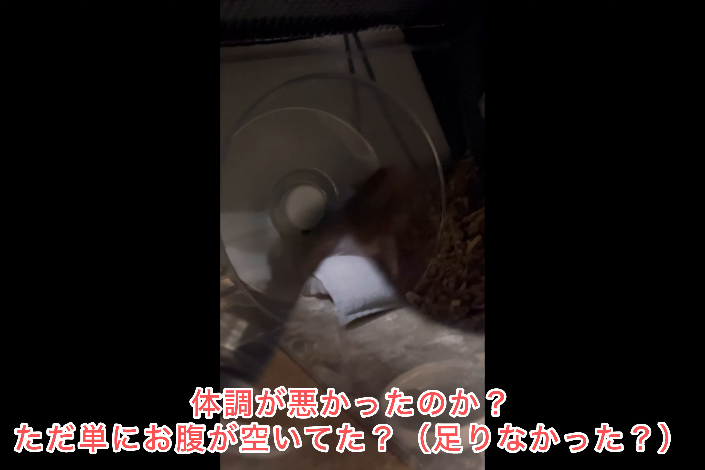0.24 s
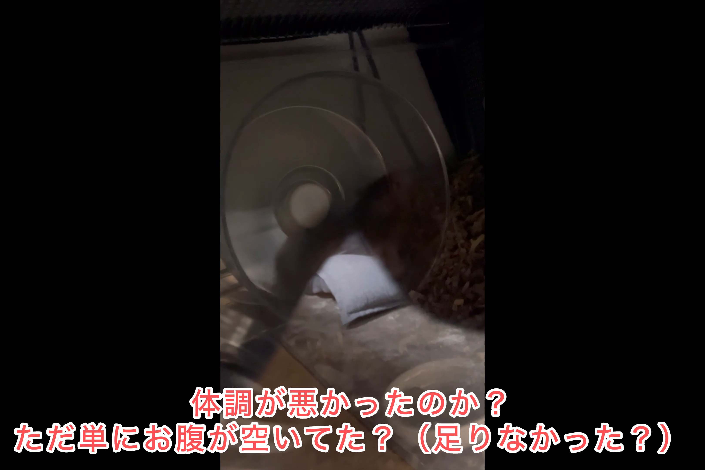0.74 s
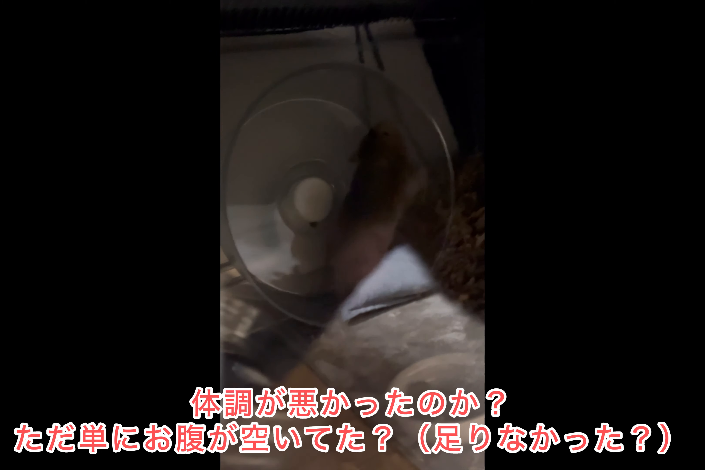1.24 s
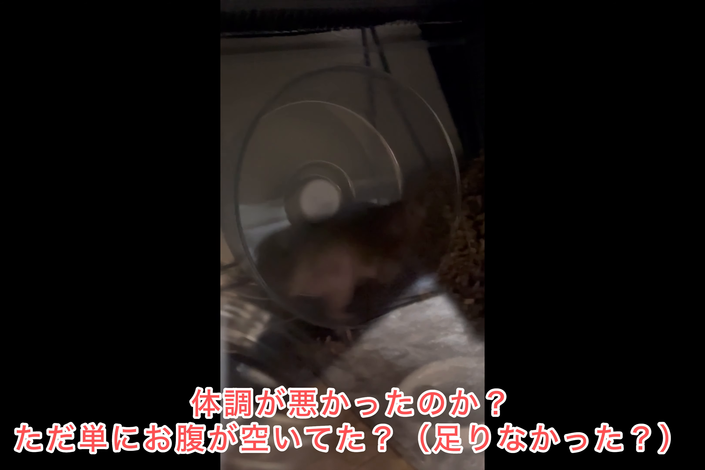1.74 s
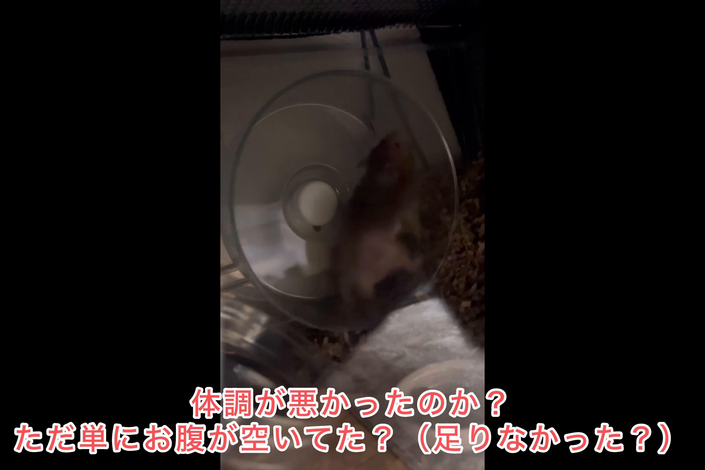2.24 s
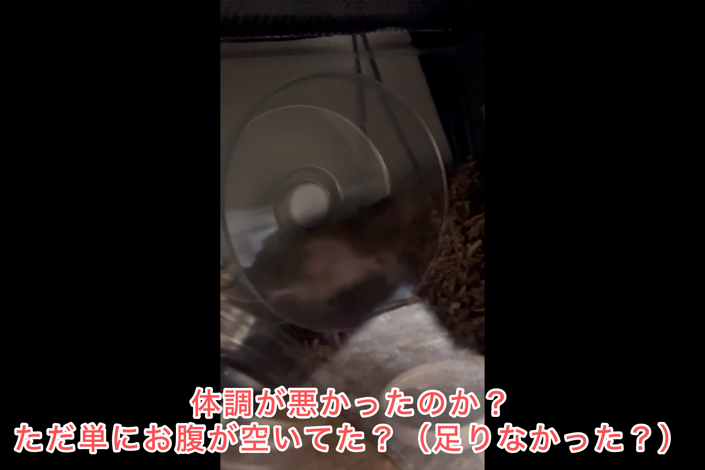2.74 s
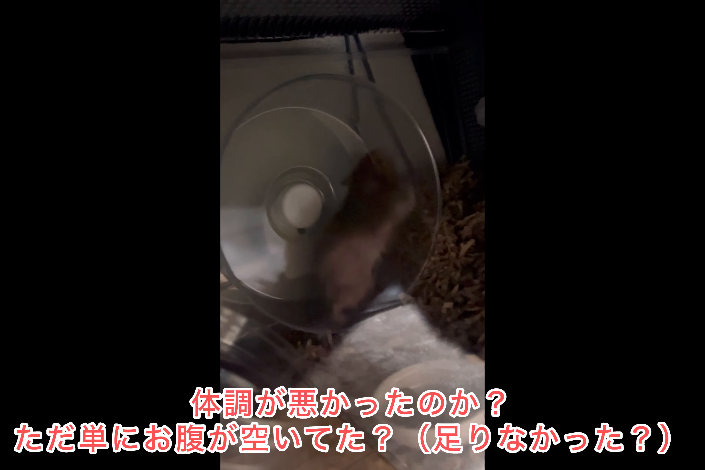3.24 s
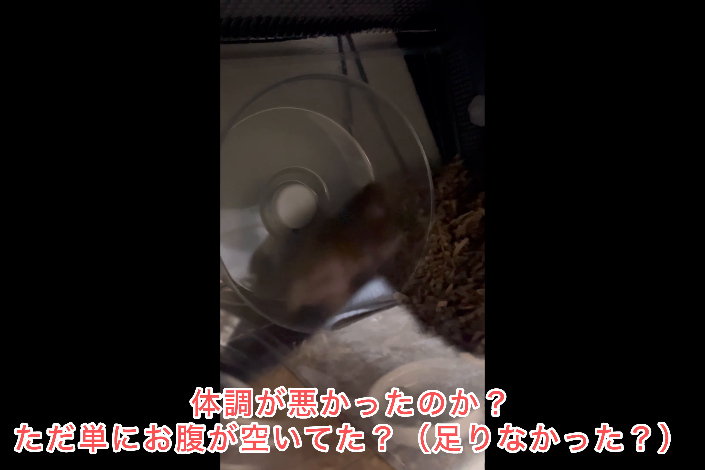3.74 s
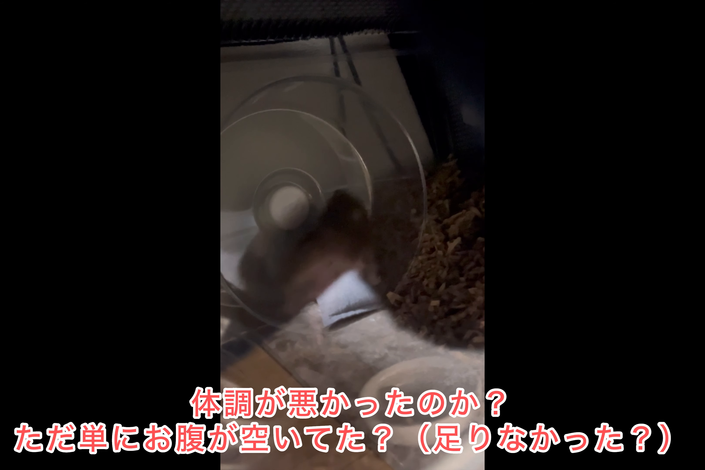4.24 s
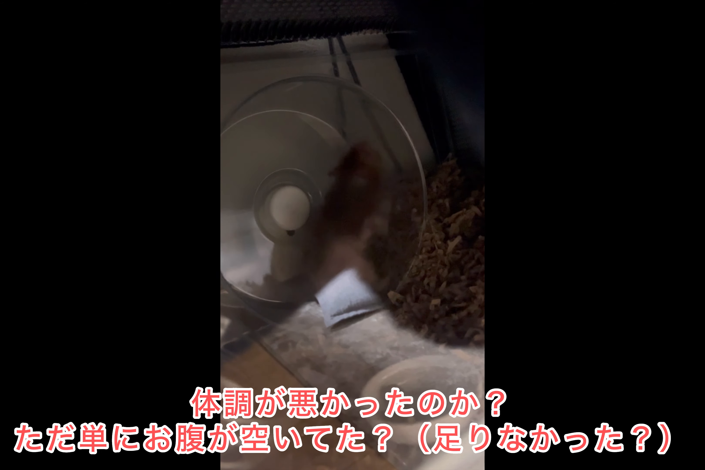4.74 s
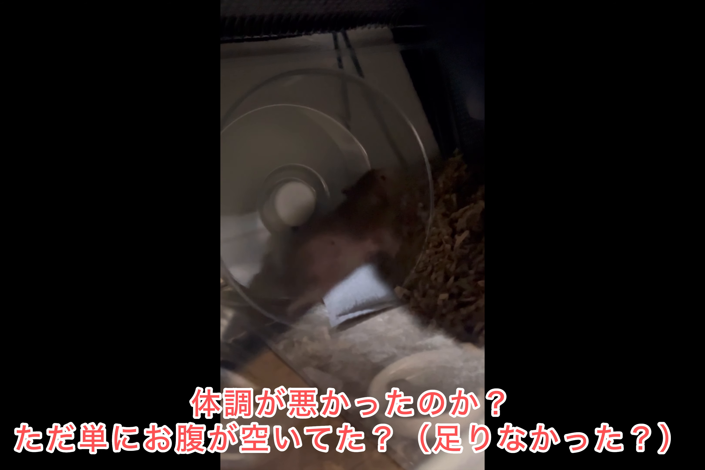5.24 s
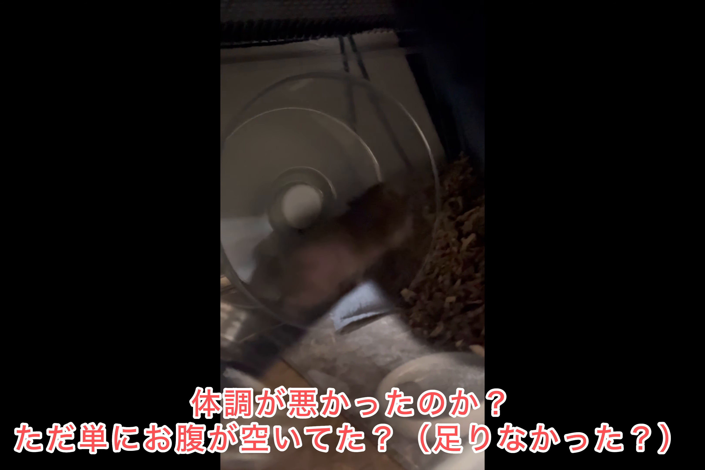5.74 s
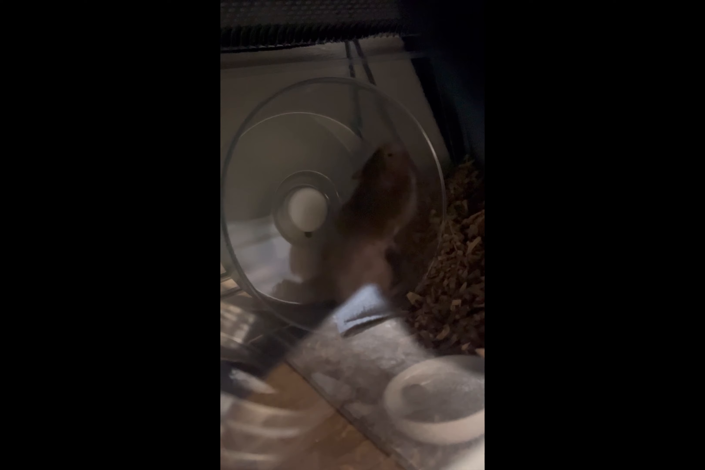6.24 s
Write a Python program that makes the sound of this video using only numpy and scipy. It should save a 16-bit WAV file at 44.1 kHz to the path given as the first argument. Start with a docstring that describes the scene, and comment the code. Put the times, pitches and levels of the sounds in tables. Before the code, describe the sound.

Indoors, close to a hand-held phone, a hamster runs in a plastic exercise wheel. From 0 s, quick scraping swishes come about seven per second, each with airy high hiss, rubbing plastic and a faint hollow ring, dipping briefly between strides. Light knocks and tiny claw-like ticks dot the first second; the hiss softens near 0.9 s and returns. Around 1.8 s a low stand rumble rises, and at 1.9 s comes the strongest dull plastic knock. Running continues steadily. At 3.3 s another thump lands, followed by close muffled rustling and soft low bumps until about 4 s. The whirr then nearly dies away at 4.2 s, leaving rumble and faint rustle, and rebuilds from 4.5 s. Strong regular strides continue to 6.5 s, with small knocks and ticks near 5.6, 5.9 and 6.4 s. Room air is faint, with short, dry reflections.

```python
"""In a quiet room, close to a hand-held phone, a hamster runs in a plastic exercise wheel standing to the left.
Each stride drives the wheel round its hub: noise filtered by resonances gives bearing hiss and a ringing drum.
A low noise rumble is the stand; the whirr nearly dies away just after four seconds, then picks up again.
Soft rustling is shaped noise; dull knocks are damped modes, and small ticks are clicks with short scratches."""
import sys
import numpy as np
from scipy import signal
from scipy.fft import rfft, irfft, next_fast_len
from scipy.io import wavfile
from scipy.ndimage import uniform_filter1d, map_coordinates

SR = 44100
rng = np.random.default_rng(int(sys.argv[2]) if len(sys.argv) > 2 else 0)


def pcm_store(signal):
    """Save signal as 16-bit PCM."""
    levels = np.round(np.clip(np.atleast_2d(signal), -1, 1) * 32767)
    wavfile.write(sys.argv[1], SR, levels.astype(np.int16).T)


N = 285750

# Spectrum columns give relative level; levels over time are set before the trims in the functions.
# rustling close to the phone, steady part: [t/s, level/dB]
RUSTLE_LEVEL = [(0, -66), (.65, -68), (1.1, -64), (1.9, -65), (2.3, -69.5), (3.1, -63), (3.25, -53),
                (3.95, -52.5), (4.1, -61.5), (4.5, -63.5), (5.2, -67.5), (5.5, -59.5), (6.1, -73),
                (6.48, -64.5)]
# single brushes over it: [middle t/s, length/s, dull level/dB, bright level/dB]
BRUSH_STROKES = [(0.122, 0.026, -66, -61), (0.279, 0.024, -58.5, -54), (0.43, 0.056, -61.5, -77),
                 (0.876, 0.55, -65.5, -64.5), (1.012, 0.093, -61.5, -55), (3.29, 0.11, -55.5, -60),
                 (3.444, 0.043, -50, -64), (3.534, 0.05, -51, -62), (3.642, 0.034, -47.5, -67),
                 (3.737, 0.13, -56, -61), (3.95, 0.15, -61, -58.5), (4.01, 0.056, -52.5, -59.5),
                 (4.193, 0.029, -50.5, -77), (4.885, 0.34, -60, -70.5), (4.96, 0.07, -71, -59),
                 (5.357, 0.3, -58.5, -59), (5.562, 0.18, -65, -57), (5.836, 0.42, -64.5, -64),
                 (6.455, 0.046, -54.5, -68)]
# spectrum of its dull part: [f/Hz, level/dB]
CLOTH_SPECTRUM = [(40, -17), (110, 4), (200, 2.5), (350, 2), (600, -3), (1000, -10.5), (2000, -27),
                  (3000, -38), (7000, -52), (15000, -60)]
# spectrum of its grainy part: [f/Hz, level/dB]
GRIT_SPECTRUM = [(100, -27), (350, 5.5), (900, 9), (1800, 0.5), (4000, 1.5), (6500, -18), (15000, -70)]
# likeness of the rustling at the left and right ports: [f/Hz, likeness/1]
RUSTLE_LIKENESS = [(60, 0.52), (130, 0.66), (290, 0.67), (640, 0.15), (1400, 0.82), (3100, 0.74),
                   (15000, 0.39)]
# rumble of the stand: [t/s, level/dB]
STAND_LEVEL = [(0, -57), (1.2, -55.5), (1.45, -60), (1.68, -60.5), (1.78, -44.5), (1.9, -51), (2.2, -45),
               (2.65, -48.5), (3.2, -44.5), (3.45, -44.5), (3.65, -39), (3.98, -45.5), (4.1, -38),
               (4.3, -47.5), (4.62, -48.5), (5.15, -57.5), (6.2, -53), (6.48, -42)]
# spectrum of that rumble: [f/Hz, level/dB]
RUMBLE_SPECTRUM = [(20, -56), (35, -47), (48, 0.5), (58, 5.5), (66, 0.5), (82, -7.5), (105, -8.5),
                   (140, -12.5), (200, -34), (400, -100)]
# dull knocks: [t/s, thump level/dB, ring level/dB, puff level/dB]
KNOCK_HITS = [(0.106, -60, -48, -62), (0.268, -59, -49, -54), (.435, -47, -44, -70), (0.868, -55, -47, -62),
              (1.276, -43.5, -67, -58), (1.538, -42.5, -48, -54), (1.937, -27, -26, -44),
              (3.275, -31.5, -45, -59), (3.69, -37, -45, -57), (4.01, -43, -49, -74),
              (4.179, -58, -44, -55), (5.608, -58, -42, -51), (6.128, -61, -46, -56.5),
              (6.426, -47, -39, -48)]
# modes of the knocked stand: [f/Hz, level/dB, t60/s]
STAND_MODES = [(75.6, 4, 0.088), (88, -4, 0.056)]
# modes of the knocked plastic: [f/Hz, level/dB, t60/s]
PLASTIC_MODES = [(368, -10, 0.14), (441, -21, 0.2), (535, -16, 0.24), (560, 0, 0.065), (640, -15, 0.03),
                 (862, -12, 0.03), (1077, -19, 0.04), (1740, -14, 0.035), (2080, -21, 0.03)]
# soft bumps, single low pushes: [t/s, level/dB, f/Hz]
BUMP_PUSHES = [(0.271, -40.5, 280), (0.297, -44, 230), (1.033, -42, 130), (3.396, -38, 85),
               (3.571, -33, 115), (3.593, -31, 85), (3.6436, -26, 172), (3.738, -37, 130),
               (3.768, -36, 110)]
# tiny dry ticks, before their colouring: [t/s, level/dB]
TICK_HITS = [(0.148, -42), (0.2665, -36), (.279, -39), (0.2915, -32), (.928, -42), (1.539, -37),
             (4.179, -47), (4.195, -47), (5.607, -39), (5.855, -38), (5.877, -42), (5.885, -44),
             (5.8947, -32)]
# phase by which the left port leads for sound from the wheel: [f/Hz, lead/rad]
PORT_LEAD = [(20, 0), (690, -1.1), (1200, -.8), (1900, .2), (2400, 2.6), (2820, 1.85), (3300, 2.5),
             (3750, 1.2), (4300, 2), (4950, 1), (6000, np.pi), (7950, 2 * np.pi), (10150, 3 * np.pi),
             (12550, 4 * np.pi), (14850, 5 * np.pi), (16000, 17.3)]
# left minus right level for sound from the wheel: [f/Hz, level/dB]
PORT_TILT = [(130, -2), (500, -1), (1100, 1), (2000, -0.5), (4000, -2), (8000, 0.5)]
# strides: [start t/s, depth of the break at the start/dB (negative lifts), middle of the stroke t/s,
#           stroke length at half power/s, push level/dB, hollow ring level/dB]
STRIDE_STROKES = [(0.019, 18, 0.07, 0.065, -51.5, -54), (0.136, 10, 0.218, 0.064, -50, -52.5),
                  (0.287, 5.5, 0.335, 0.042, -51, -60), (0.409, 2, 0.485, 0.041, -47.5, -58.5),
                  (0.548, 6, 0.592, 0.045, -51, -56.5), (0.676, 22, 0.747, 0.055, -49, -57.5),
                  (0.814, 11, 0.879, 0.063, -63, -73), (0.95, -0.5, 1.054, 0.05, -53, -57.0),
                  (1.123, 3, 1.186, 0.073, -56.5, -58.0), (1.249, 17, 1.335, 0.067, -49.0, -54.5),
                  (1.41, 4.5, 1.47, 0.068, -50, -57), (1.537, 14, 1.613, 0.047, -50.5, -58.0),
                  (1.673, 5.5, 1.726, 0.045, -51, -60), (1.798, 21, 1.862, 0.068, -52, -57.5),
                  (1.937, 10, 1.989, 0.055, -58.5, -59), (2.077, 18, 2.159, 0.055, -53, -55),
                  (2.225, 5, 2.298, 0.035, -56.5, -64), (2.344, 5, 2.44, 0.064, -55.5, -50),
                  (2.52, 4.5, 2.582, 0.066, -52.5, -53.5), (2.655, 16, 2.723, 0.066, -51, -58),
                  (2.788, 4.5, 2.856, 0.04, -51, -61), (2.933, 7, 3.01, 0.061, -54, -57),
                  (3.071, 6, 3.131, 0.059, -58, -56), (3.213, 19, 3.284, 0.061, -48.5, -56),
                  (3.369, 12, 3.423, 0.051, -51.5, -52), (3.488, 16, 3.565, 0.068, -51.5, -53.5),
                  (3.62, 2, 3.71, 0.042, -52.5, -55.5), (3.792, 0, 3.851, 0.055, -53, -57),
                  (3.888, -3.5, 3.955, 0.055, -55.5, -64), (4.018, -1, 4.063, 0.068, -62.5, -66.5),
                  (4.3, 2, 4.356, 0.062, -67.5, -66), (4.415, -2, 4.45, 0.035, -74, -80),
                  (4.507, 3, 4.58, 0.065, -57, -62), (4.63, 1, 4.702, 0.12, -61, -61.5),
                  (4.753, -2.5, 4.805, 0.045, -60, -59.5), (4.843, 5, 4.95, 0.097, -53, -64),
                  (5.03, 3, 5.102, 0.081, -60, -64), (5.172, 6, 5.26, 0.046, -51, -64),
                  (5.327, -1, 5.388, 0.052, -49.5, -59.5), (5.451, 9, 5.526, 0.047, -48.5, -57),
                  (5.596, 3, 5.657, 0.073, -52.5, -58), (5.735, 24, 5.803, 0.047, -46, -55),
                  (5.874, 4, 5.919, 0.041, -54.5, -61.0), (6.007, 9, 6.097, 0.05, -53.0, -67),
                  (6.168, -0.5, 6.221, 0.041, -56, -55.5), (6.287, 5, 6.367, 0.056, -49.5, -54.0),
                  (6.43, 0, 6.468, 0.034, -55, -61)]
# bearing hiss, following the turning of the wheel: [t/s, level/dB]
SPIN_LEVEL = [(0, -47.5), (.6, -47), (.88, -55), (1.35, -45), (1.72, -45), (2.0, -55), (2.5, -45.5),
              (3.1, -52.5), (3.55, -48), (3.85, -49), (4.08, -57.5), (4.2, -85), (4.34, -78), (4.46, -63),
              (4.6, -53), (4.9, -49.5), (5.12, -51), (5.7, -48), (6.1, -53.5), (6.48, -49.5)]
# abrupt catches of the bearing at the start of some strides: [t/s, peak level/dB]
BEARING_CATCHES = [(1.808, -49), (2.6688, -40.5)]
# resonances of the plastic drum and the hollows between them: [f/Hz, width/Hz, lift/dB]
DRUM_RESONANCES = [(1250, 75, 13.5), (1335, 50, 9), (1510, 90, 4), (1755, 75, 18.5), (1960, 120, -3),
                   (2155, 70, 13.5), (2400, 70, 5.5), (2600, 100, -5), (2730, 50, 6), (2820, 70, 14),
                   (2975, 45, 13), (3090, 110, -5), (3165, 40, 7), (3350, 130, 7), (3550, 60, 11),
                   (3770, 110, -9), (3935, 50, 9), (4430, 130, 5), (4655, 60, 11), (4760, 70, -4),
                   (4870, 90, 7), (5090, 45, 7), (5290, 160, 10), (5790, 60, 12), (5950, 110, 8),
                   (6210, 40, 8), (6480, 80, 6), (6610, 70, 8), (6820, 40, 4), (7230, 160, -7),
                   (7360, 40, 6), (7490, 70, 6), (7680, 160, -5), (7920, 90, 6), (8050, 70, 8),
                   (8180, 80, -6), (8330, 160, 5), (8580, 150, 4), (8835, 55, 7), (8930, 90, -4),
                   (9280, 140, 4), (9510, 80, 6), (10060, 140, 5), (10310, 90, 9), (10520, 90, -4),
                   (10670, 70, 5), (10790, 60, -5), (11060, 120, 4), (11320, 60, 5), (11680, 60, 5),
                   (11780, 70, -4), (12270, 70, 4), (12370, 70, 6), (12580, 170, -5), (13125, 50, 5),
                   (13210, 70, -4), (13500, 250, 4), (14330, 60, 7), (14480, 120, 3)]
# spectrum driving the low ring of the drum: [f/Hz, level/dB]
RING_SPECTRUM = [(500, -31), (1000, -4.5), (1250, 0), (1750, -5.5), (2150, -9), (2600, 4), (5000, -83)]
# spectrum driving the rubbing plastic: [f/Hz, level/dB]
RUB_SPECTRUM = [(800, -10), (1800, -11), (2500, 2.5), (3100, -2), (3750, 0), (4500, 4.5), (5600, -1.5),
                (6200, -30), (7500, -15), (16000, -15)]
# spectrum driving the bearing hiss: [f/Hz, level/dB]
HISS_SPECTRUM = [(1000, -27), (2600, -26), (3500, -7), (5500, -9.5), (7200, 1), (8200, 1), (10000, 0),
                 (10800, -3), (12000, 3.5), (14200, 2), (15000, 2), (15500, 2.5)]


def amp(db):
    """Decibels to gain."""
    return 10 ** (np.asarray(db) / 20)


def unit(x):
    """Scale to rms 1."""
    return x / np.sqrt(np.mean(x ** 2) + 1e-20)


def along(points, hz):
    """(Hz, value) points on a log axis."""
    f, v = np.transpose(points)
    return np.interp(np.log(hz + 1), np.log(f + 1), v)


def curve(rows):
    """(s, value) rows, one value per sample."""
    return np.interp(np.arange(N) / SR, *np.transpose(rows))


def wobble(rate):
    """A smooth random curve, rate knots a second."""
    return map_coordinates(rng.standard_normal(int(N * rate / SR) + 4), [np.arange(N) * rate / SR])


def filtered(x, response):
    """x times a complex response of frequency."""
    m = next_fast_len(N + SR // 2)
    return irfft(rfft(x, m) * response(np.fft.rfftfreq(m, 1 / SR)), m)[..., :N]


def coloured(x, spectrum):
    """x with the given spectrum, at rms 1."""
    return unit(filtered(x, lambda hz: amp(along(spectrum, hz))))


def friction(rate, rough_db):
    """Noise that comes in tiny random clumps, as surfaces catch and slip."""
    return rng.standard_normal(N) * amp(rough_db * wobble(rate))


def add(track, s, sound):
    """Mix a sound into a track at time s."""
    part = track[round(s * SR):][:len(sound)]
    part += sound[:len(part)]


def spread(a, b, alike):
    """Two unrelated signals to a stereo pair of the given likeness."""
    turn = lambda hz: np.arccos(np.clip(along(alike, hz), -1, 1)) / 2
    mid, side = filtered(np.array([a, b]), lambda hz: np.array([np.cos(turn(hz)), np.sin(turn(hz))]))
    return unit(np.array([mid + side, mid - side]))


def tail(t60):
    """A dense cluster of modes: decaying noise of energy 1."""
    t = np.arange(SR // 4) / SR
    ring = rng.standard_normal(len(t)) * amp(-60 * t / t60)
    return ring / np.linalg.norm(ring)


def from_wheel(x):
    """Sound from the wheel reaches the two microphone ports out of step and not quite equally."""
    sides = np.array([[.5], [-.5]])  # left, right
    return filtered(x, lambda hz: np.exp(1j * sides * along(PORT_LEAD, hz)) * amp(sides * along(PORT_TILT, hz)))


def stride_slack():
    """Swing between 1 at each stride's start and 0 halfway to the next."""
    start = np.transpose(STRIDE_STROKES)[0]
    edges = np.append(start, start[-1] + np.mean(np.diff(start)))
    stride_count = np.interp(np.arange(N) / SR, edges, np.arange(len(edges)))
    return np.cos(np.pi * stride_count) ** 2


def room_air():
    """The room's faint hiss: low-heavy noise, independent at the two ports."""
    spectrum = [(40, 11), (300, 4), (2000, -31), (6000, -50), (15000, -46)]  # f/Hz, level/dB
    return amp(-71.5) * coloured(rng.standard_normal((2, N)), spectrum)


def close_walls(near):
    """The close walls of the pen return a short, dense, decaying tail, drawn separately for each port."""
    level_db = -18
    return amp(level_db) * np.array([signal.fftconvolve(port, tail(t60=0.029))[:N] for port in near])


def rustle():
    """Clumpy noise gives dull, grainy rustling close by; single brushes swell and fade over it."""
    grit_db, grit_follows = -73, 0.33  # mean level/dB; dB of grit for each dB of rustling
    t, steady_db = np.arange(N) / SR, curve(RUSTLE_LEVEL)
    dull = amp(steady_db)
    bright = amp(grit_db + grit_follows * (steady_db - steady_db.mean()))
    for s, length, dull_db, bright_db in BRUSH_STROKES:
        swell = 1 / (1 + (2 * (t - s) / length) ** 2)
        dull = np.hypot(dull, amp(dull_db) * swell)
        bright = np.hypot(bright, amp(bright_db) * swell)
    cloth = [coloured(friction(rate=180, rough_db=2.5), CLOTH_SPECTRUM) for _ in range(2)]
    grit = [coloured(friction(rate=600, rough_db=2.5), GRIT_SPECTRUM) for _ in range(2)]
    dull_sound = amp(5.5) * dull * spread(*cloth, RUSTLE_LIKENESS)
    return dull_sound + amp(4.0) * bright * spread(*grit, RUSTLE_LIKENESS)


def stand():
    """The turning wheel shakes its stand: a low noise rumble, lifted in the middle of each stride."""
    rock_db = 1.5  # swing of the rumble with each stride
    low = coloured(rng.standard_normal(N), RUMBLE_SPECTRUM)
    # dividing by the short-term strength evens out the noise's own swells
    strength = np.sqrt(np.abs(uniform_filter1d(low ** 2, size=4000)) + 1e-6)
    return amp(curve(STAND_LEVEL) + rock_db * (.5 - stride_slack())) * low / strength


def ringing(modes, attack):
    """Damped modes after a soft contact, their strengths varying slightly from hit to hit."""
    t = np.arange(SR // 3) / SR
    ring = sum(amp(db + rng.normal(0, 0.23) - 60 * t / t60) * np.sin(2 * np.pi * hz * t) for hz, db, t60 in modes)
    return ring * (1 - np.exp(-t / attack))


def knocks():
    """Each knock rings the plastic, rattles briefly and rocks the stand; a bump is one push without ring."""
    track, t = np.zeros(N), np.arange(SR // 3) / SR
    puff_spectrum = [(100, 10.5), (500, 7.5), (1800, -5.5), (2800, -9), (9000, -48)]  # f/Hz, level/dB
    rattle_spectrum = [(150, -26), (330, 4.5), (580, -8.5), (800, -6.5), (3000, -54)]  # f/Hz, level/dB
    puffs = coloured(rng.standard_normal(N), puff_spectrum)
    rattles = coloured(rng.standard_normal(N), rattle_spectrum)
    for k, (s, thump_db, ring_db, puff_db) in enumerate(KNOCK_HITS):
        own = slice(k * len(t), (k + 1) * len(t))  # fresh noise for each knock
        puff = amp(puff_db + 6.0 - 60 * t / 0.1) * (1 - np.exp(-t / 0.00056)) * puffs[own]
        ring = amp(ring_db) * ringing(PLASTIC_MODES, attack=0.0032)
        rattle = amp(ring_db - 15.5 - 60 * t / 0.28) * rattles[own]
        thump = amp(thump_db + 4.5) * ringing(STAND_MODES, attack=0.0086)
        add(track, s - .003, puff)
        add(track, s, ring + rattle)
        add(track, s + 0.0069, thump)
    for s, db, hz in BUMP_PUSHES:
        phase = 2 * np.pi * hz * (np.arange(N) / SR - s)  # the push lasts about one cycle
        track -= amp(db) * np.sin(phase) * np.exp(-(phase / np.pi) ** 2 / 2)
    return from_wheel(track)


def ticks():
    """Tiny dry ticks, as of claws on plastic: a one-sample contact and a short noise scratch."""
    track, t = np.zeros(N), np.arange(SR // 50) / SR
    for s, db in TICK_HITS:
        contact = amp(7) * (t == 0)
        scratch = amp(-12 - 60 * t / .004) * rng.standard_normal(len(t))
        add(track, s, amp(db) * (contact + scratch))
    claw = [(300, -14), (1500, 4.5), (4800, 10), (8000, -10), (15000, -14)]  # f/Hz, gain/dB
    return from_wheel(filtered(track, lambda hz: amp(along(claw, hz))))


def shell(x, spectrum, patchy_db):
    """Friction through the drum's resonances; its strength at each pitch shifts as the contact travels round."""
    z = signal.stft(x, nperseg=512)[2]
    # random patches, smoothed over frequency and then over time
    field = signal.convolve2d(rng.standard_normal(z.shape), np.hanning(7)[:, None], "same")
    field = signal.fftconvolve(field, np.hanning(36)[None], "same", axes=1)
    patchy = signal.istft(z * amp(patchy_db * unit(field)), nperseg=512)[1][:N]
    lift_db = lambda hz: sum(db / (1 + (2 * (hz - c) / width) ** 2) for c, width, db in DRUM_RESONANCES)
    return unit(filtered(patchy, lambda hz: amp(along(spectrum, hz) + lift_db(hz))))


def flexed(x):
    """The drum flexes under the animal, so its resonances glide slightly up and down."""
    bend = 0.0035  # typical share by which the pitch glides
    place = np.cumsum(1 + bend * wobble(12))
    return map_coordinates(x, [place], order=3, mode="mirror")


def stride_levels(hiss_swell_db, fade_s, restart_s):
    """Strokes swell and fade in the drum; the hiss holds on, fades between strides and restarts quickly."""
    stroke_edge = 4.95  # how steeply a stroke swells and fades
    rub_drag_db, ring_drag_db = -18, -21  # light rubbing and ringing between strokes, against the spin
    hiss_per_push = 0.14  # dB of hiss for each dB that a stride is stronger than its neighbours
    t = np.arange(N) / SR
    start, break_db, middle, length, push_db, hollow_db = np.transpose(STRIDE_STROKES)

    spin_db = curve(SPIN_LEVEL)
    for s, depth in zip(start, break_db):
        pace = np.where(t < s, fade_s, restart_s)
        spin_db = spin_db - depth / (1 + ((t - s) / pace) ** 2) ** 2

    coarse = t[::32]  # fine enough for the slow stroke shapes
    swells = 1 / (1 + np.abs(2 * (coarse - middle[:, None]) / length[:, None]) ** stroke_edge)

    def strokes(db, drag_db):
        """Add the powers of the strokes and of the drag between them."""
        stroke_power = np.interp(t, coarse, amp(db) ** 2 @ swells)
        return np.sqrt(stroke_power + amp(spin_db + drag_db) ** 2)

    stride = np.clip(np.searchsorted(start, t) - 1, 0, None)
    accent_db = push_db - uniform_filter1d(push_db, size=3)
    accent_db = uniform_filter1d(accent_db[stride], size=4200)
    hiss = amp(spin_db + hiss_per_push * accent_db - hiss_swell_db * stride_slack())
    return strokes(push_db, rub_drag_db), strokes(hollow_db, ring_drag_db), hiss


def wheel():
    """Friction at the hub hisses and rings the drum, stride by stride."""
    flutter_db, ring_trim_db, rub_trim_db, hiss_trim_db = 0.8, -3, 0, 1.02
    push, hollow, spin = stride_levels(hiss_swell_db=2.3, fade_s=0.026, restart_s=0.013)
    grip = amp(flutter_db * wobble(28))  # the contact pressure flutters within a stride
    ring = hollow * grip * shell(friction(rate=390, rough_db=3.0), RING_SPECTRUM, patchy_db=-0.5)
    rub = push * grip * shell(friction(rate=760, rough_db=2.0), RUB_SPECTRUM, patchy_db=3.0)
    hiss_noise = shell(friction(rate=450, rough_db=0.15), HISS_SPECTRUM, patchy_db=2.25)
    hiss = spin * amp(1.13 * wobble(55)) * hiss_noise
    t = np.arange(SR // 10) / SR
    for s, db in BEARING_CATCHES:
        scrape = coloured(rng.standard_normal(N), HISS_SPECTRUM)[:len(t)]
        add(hiss, s, amp(db - 6 - 60 * t / 0.23) * scrape)  # 6 dB leaves room for the noise peaks
    drum = flexed(amp(ring_trim_db) * ring + amp(rub_trim_db) * rub)
    return from_wheel(drum + amp(hiss_trim_db) * hiss)


def scene():
    """Room air, close walls, rustling and stand lie behind the knocks, ticks and wheel."""
    near = knocks() + ticks() + wheel()
    return room_air() + close_walls(near) + rustle() + stand() + near


def record(dry):
    """The phone keeps nothing above its band limit."""
    top_hz = 15800
    return filtered(dry, lambda hz: hz < top_hz)


dry = scene()
out = record(dry)
pcm_store(out)
```